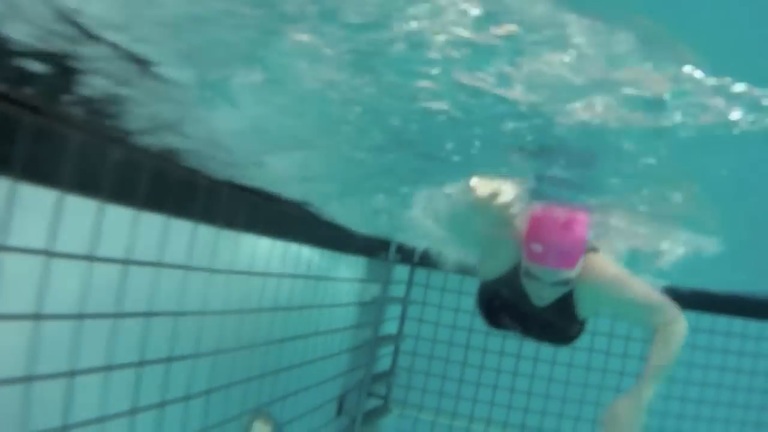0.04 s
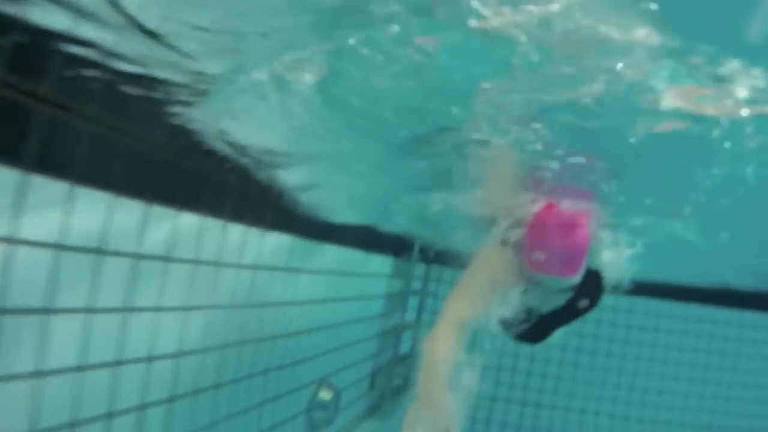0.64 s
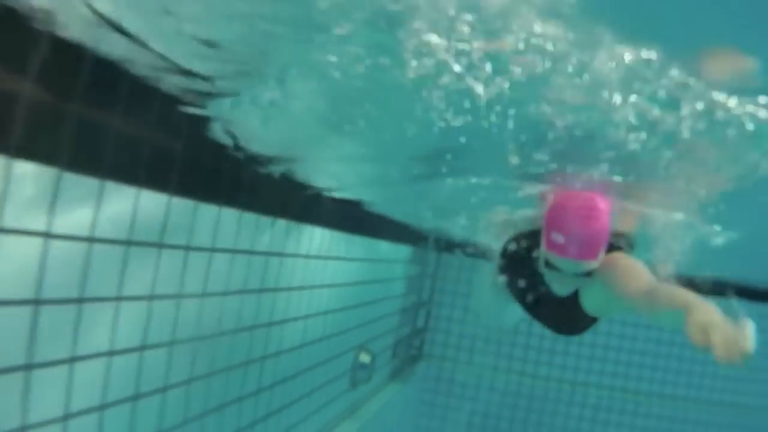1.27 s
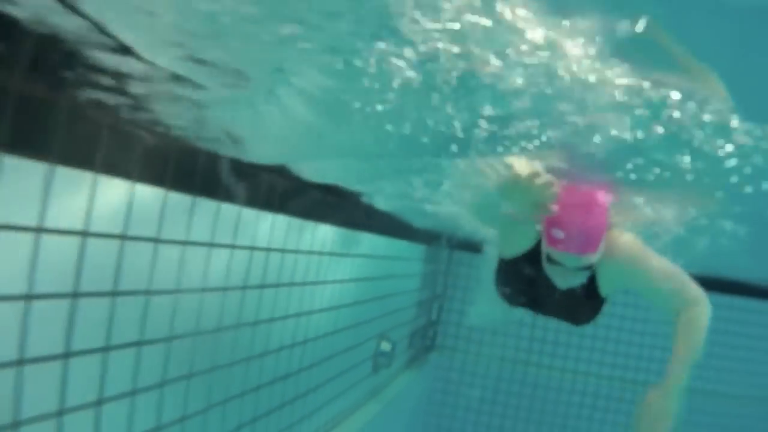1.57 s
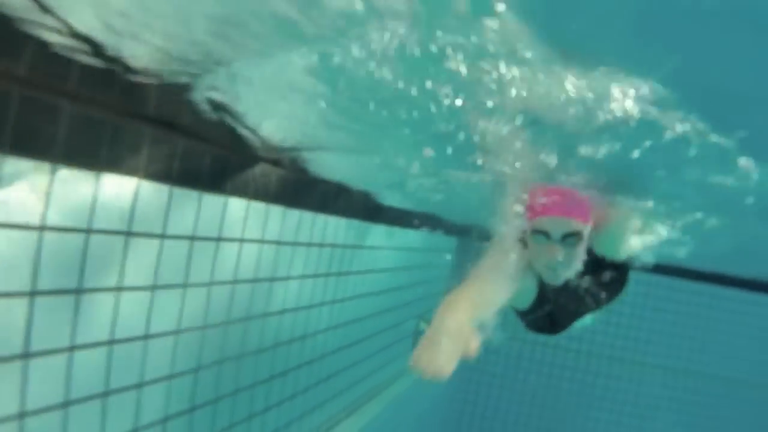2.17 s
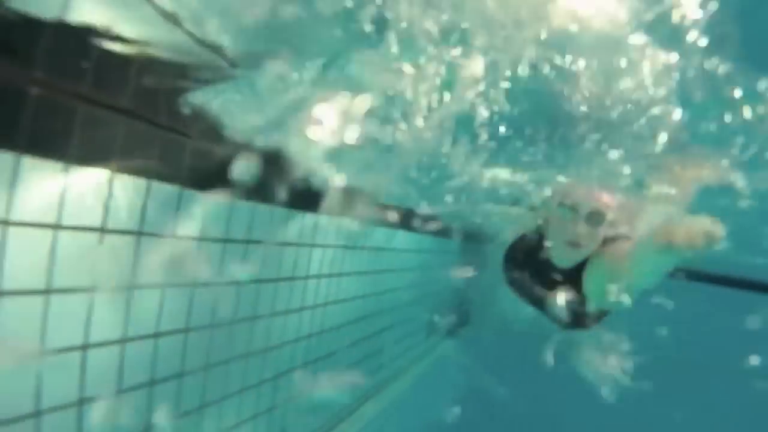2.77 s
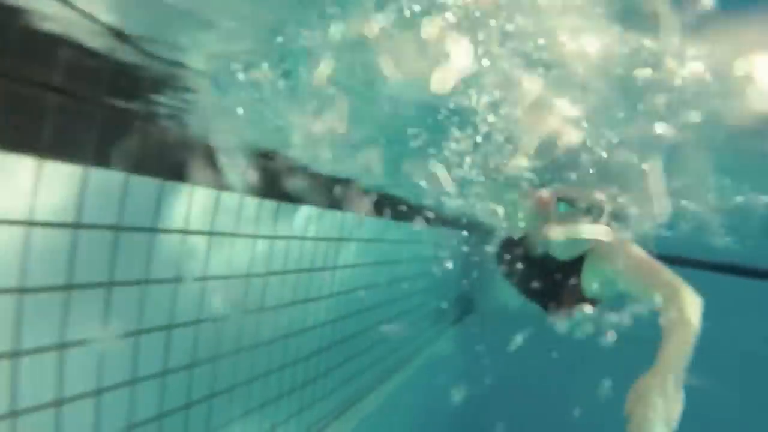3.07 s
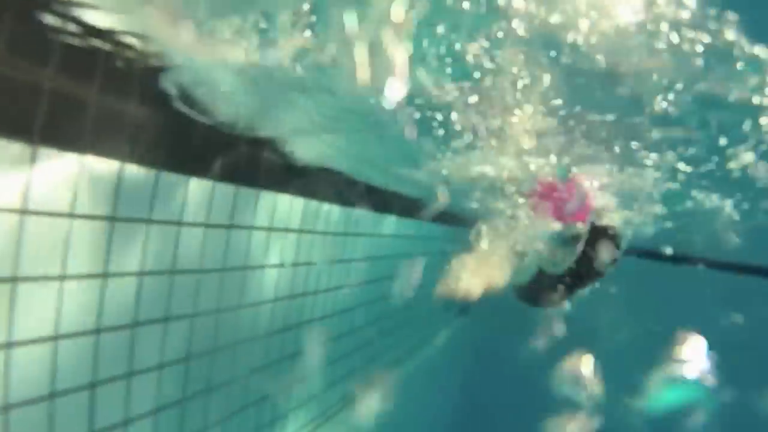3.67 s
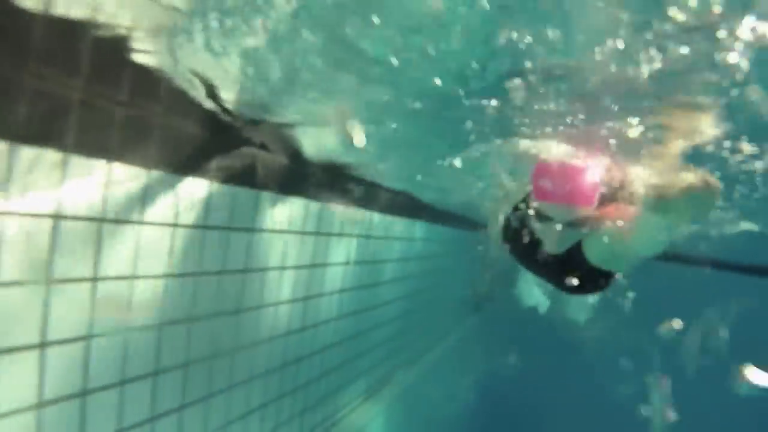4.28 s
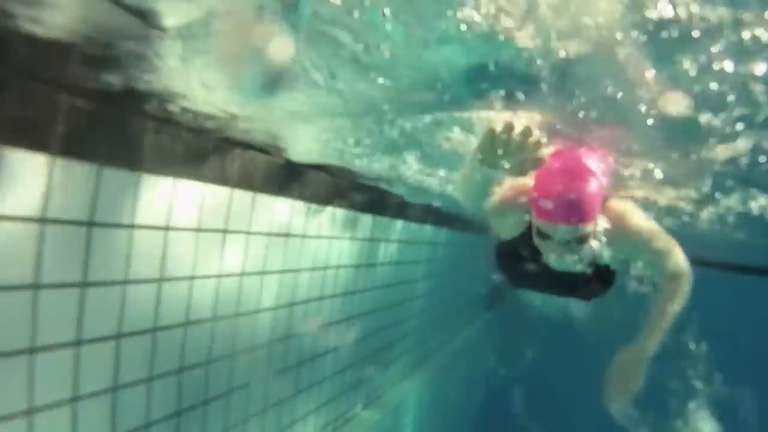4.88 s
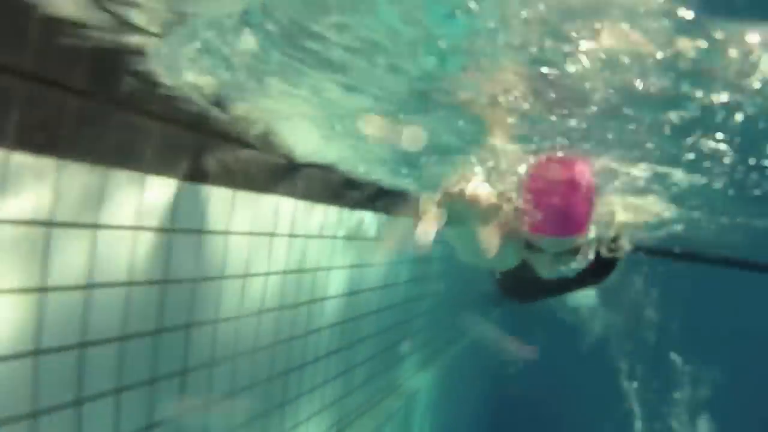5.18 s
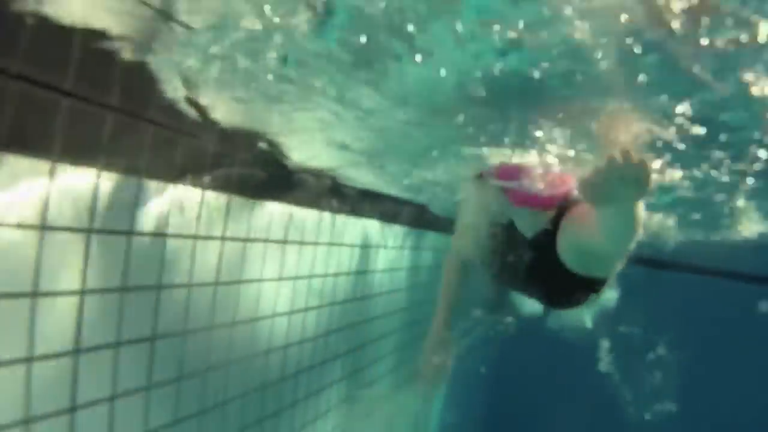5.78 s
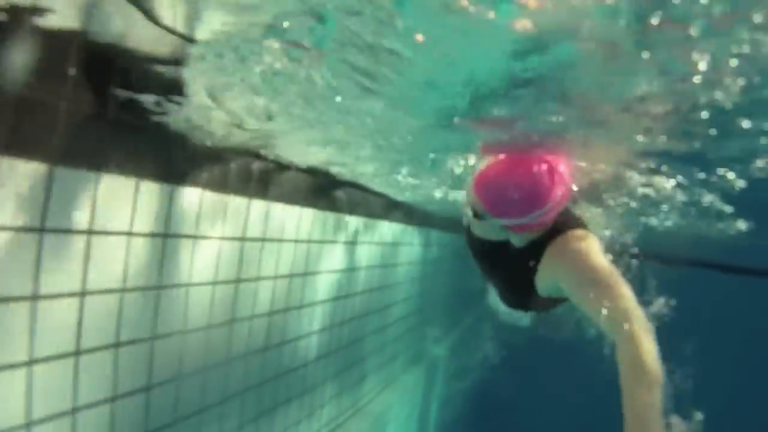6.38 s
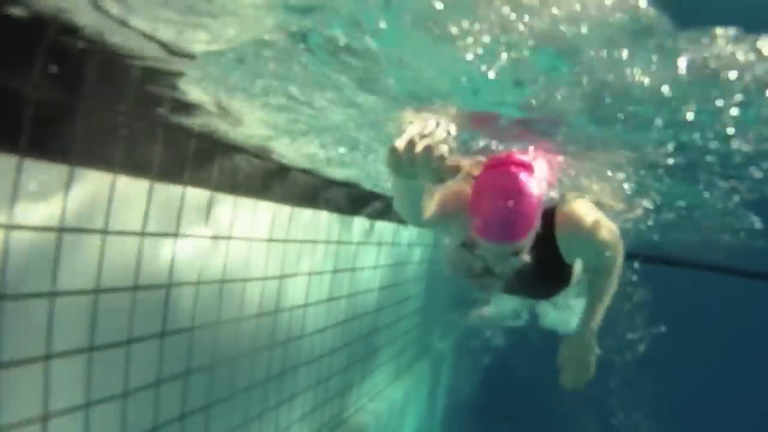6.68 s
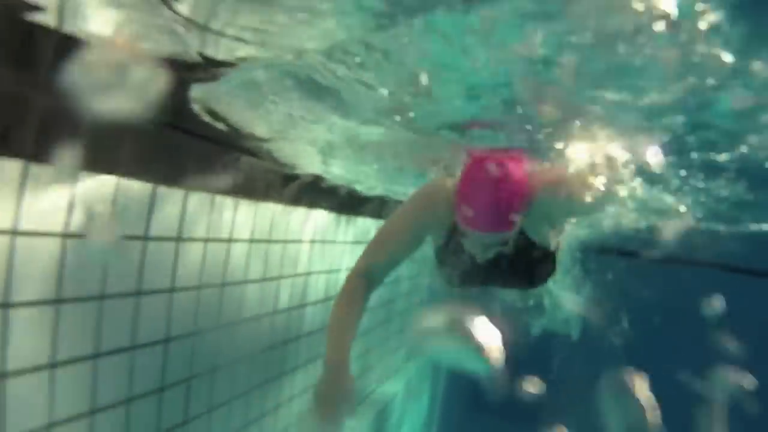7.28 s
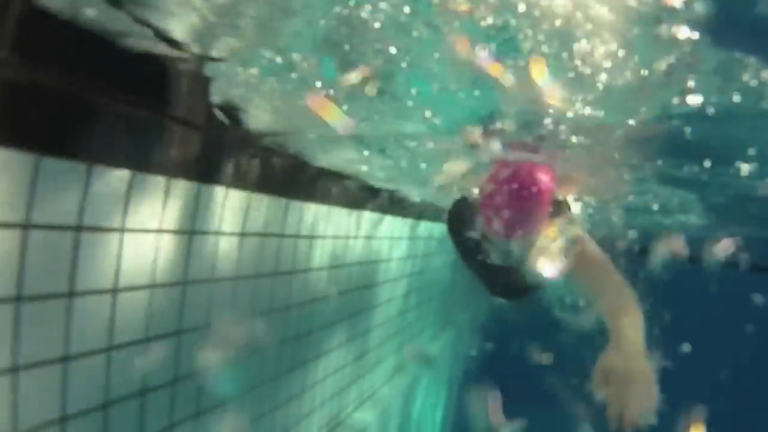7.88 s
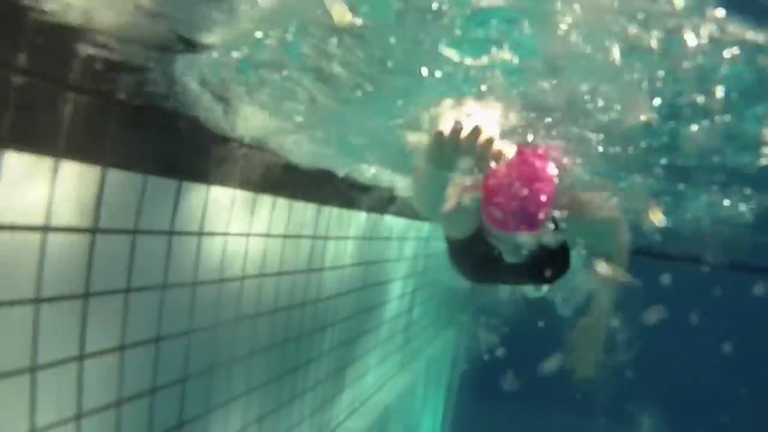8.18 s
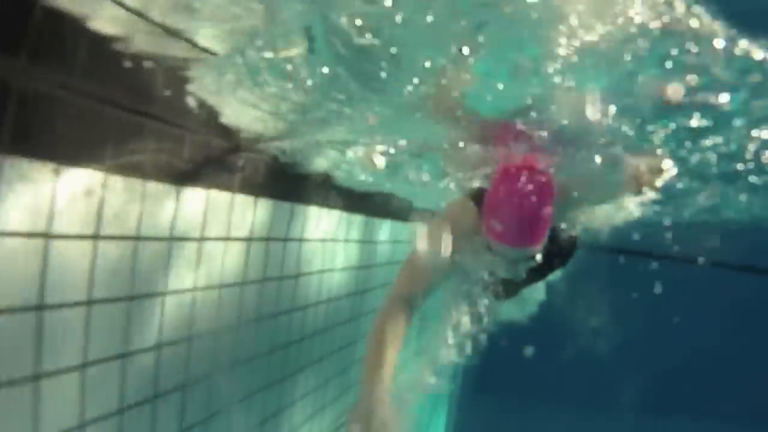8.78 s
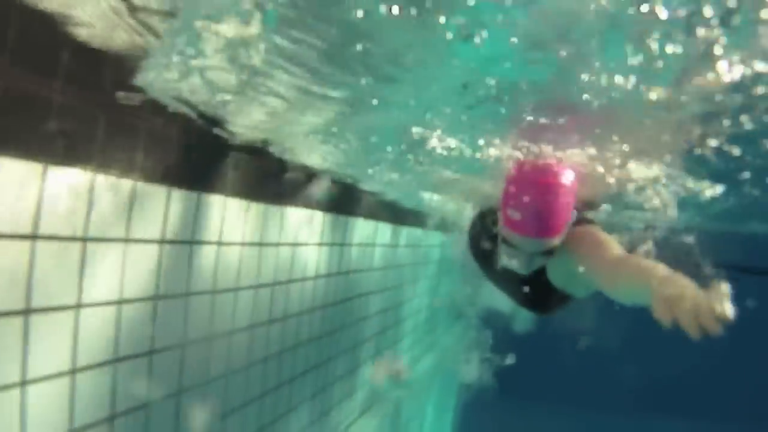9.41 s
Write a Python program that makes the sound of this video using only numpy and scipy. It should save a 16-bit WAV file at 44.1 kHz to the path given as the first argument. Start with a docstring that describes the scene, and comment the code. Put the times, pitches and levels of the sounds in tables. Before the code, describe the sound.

Underwater in a pool, a swimmer's crawl makes continuous bubbling and hollow glugs, with short splashes over a low rumble.

```python
"""An indoor pool, under water: a swimmer's crawl, heard through a camera's waterproof case.
Strokes and kicks drag air down. Each bubble rings as it pinches off, its air the spring and the
water around it the mass, and clouds of them gurgle close by. A large air pocket wobbles, the current
rumbles on the case and tiny bubbles tick against it. The camera limits loud peaks and samples at a
low rate, whose spectral images add a gritty sheen."""
import sys
import numpy as np
from scipy import signal
from scipy.fft import rfft, irfft, next_fast_len
from scipy.io import wavfile
from scipy.ndimage import uniform_filter1d, map_coordinates

SR = 44100
rng = np.random.default_rng(int(sys.argv[2]) if len(sys.argv) > 2 else 0)


def materialize(psi):
    """Save the field psi as 16-bit PCM at rate SR to the path in sys.argv[1].

    A 1-D psi becomes a single channel; in a 2-D psi each row is a channel.
    """
    bounded = np.clip(np.atleast_2d(psi).T, -1, 1)
    quanta = np.round(bounded * 32767).astype(np.int16)
    wavfile.write(sys.argv[1], SR, quanta)


N = 425565

# water pushing past the case: t/s, relative level/dB
CURRENT_LEVELS = [(0, -34), (.65, -34.5), (2.1, -38), (2.55, -34.5), (3.7, -40.5), (4.5, -36.5), (5, -39),
                  (5.5, -35.5), (6.3, -36.5), (8.6, -36.5), (9.65, -40)]
# spectrum of its turbulent pressure: f/Hz, relative level/dB
RUMBLE_SPECTRUM = [(12, -20), (22, 5), (45, -3), (78, -1.5), (100, 1.5), (125, -8.5), (155, -5.5),
                   (210, -17.5), (330, -9.5), (500, -20), (1000, -39.5)]
# transmission through the case: f/Hz, gain/dB
CASE_RESPONSE = [(200, -15), (400, -13.5), (480, -15.5), (630, -2), (780, -6), (1080, -14), (1200, -3),
                 (1400, -2.5), (1800, -8), (2150, 3), (2600, -8), (3500, -8), (4100, -16), (5600, 0)]
# the sharpest bursts of tiny bubbles on the case: t/s, level/dB
SHARP_TICKS = [(0.297, -22), (.7501, -27), (2.311, -31), (2.6632, -24), (3.0953, -29), (3.3798, -24),
               (3.7019, -31), (4.0455, -28.5), (4.164, -32.5), (4.402, -22.5), (6.826, -31), (7.8569, -27),
               (7.9388, -31), (8.752, -28.5)]
# big bubbles tearing off and shoving the case: t/s, peak level/dB
CASE_SHOVES = [(0.091, -17.5), (1.554, -14), (2.303, -15), (2.591, -8), (3.332, -5.5), (6.346, -20),
               (6.562, -10), (7.264, -10), (8.002, -11)]
# hands and feet slapping through the surface: t/s, peak level/dB
SURFACE_SLAPS = [(.576, -13), (.625, -13), (.663, -15.5), (2.92, -9), (3.11, -13), (4.337, -13),
                 (4.4, -8.5), (4.832, -12.5), (4.933, -12), (5.101, -11), (5.66, -9.5), (5.963, -14),
                 (6.346, -13.5), (6.454, -14), (7.14, -21), (7.557, -7.5), (7.732, -8), (8.317, -11),
                 (8.64, -26), (8.742, -12.5), (9.512, -14.5)]
# a large air pocket, one list for each time it forms: t/s, f/Hz, relative level/dB
POCKET_GLIDES = [
    [(.3, 342.4, -38), (.48, 338, -34), (.8, 355, -39.5), (1.23, 280.5, -43.5), (1.64, 270, -36),
     (1.87, 275, -43.5), (2.03, 295, -34), (2.1, 369, -29), (2.2, 447, -55)],
    [(2.55, 326, -36.5), (2.73, 250, -23.5), (2.95, 280, -32.5), (3.12, 316, -35), (3.32, 373, -33.5),
     (3.46, 480, -21), (3.62, 550, -27), (3.8, 570, -29)],
    [(7.44, 429, -27.5), (7.56, 363, -44), (7.68, 371.5, -31), (7.75, 400.3, -35.5), (8.2, 443, -43)],
]
# fainter bubbles, by size: f/Hz, rate/(1/s), peak level/dB, t60/s
STRAY_CLASSES = [(600, 2, -17.5, .06), (810, 2.5, -17.5, .04), (1310, 5, -17, .042), (2150, 3, -18.5, .018),
                 (3300, 2.5, -23, .012)]
# strength of the swarms: t/s, large-bubble level/dB, small-bubble level/dB
SWARM_LEVELS = [(0, -23, -38), (.25, -30, -35.5), (.65, -28.5, -36.5), (.9, -28, -37.5), (1.2, -26, -42),
                (1.6, -30, -35), (1.95, -34, -39.5), (2.2, -26.5, -37.5), (2.5, -19, -32),
                (2.82, -19.5, -40.5), (3.14, -23, -30), (3.5, -25, -41.5), (3.85, -26.5, -34.5),
                (4.2, -34.5, -39), (4.48, -25, -36.5), (5, -37, -37), (5.9, -34, -36.5),
                (6.5, -28.5, -36.5), (6.9, -33, -34.5), (7.18, -25.5, -35.5), (7.34, -25.5, -40.5),
                (7.6, -27, -32.5), (8.75, -31, -35), (9.65, -33.5, -39.5)]
# the loudest near bubbles: t/s, f/Hz, peak level/dB, t60/s
NEAR_BUBBLES = [(.009, 687, -9.5, 0.093), (.089, 637, 0, 0.025), (.094, 2080, -8, 0.0074),
                (.207, 1234, -9, 0.03), (.214, 810, -6, 0.045), (.22, 349, -15.5, .18),
                (.32, 346, -14, 0.28), (.332, 765, -17, 0.054), (.679, 2100, -9.5, 0.014),
                (.833, 696, -14, 0.23), (.863, 602, -5, 0.064), (1.059, 649, -7.5, 0.079),
                (1.119, 683, -8, 0.071), (1.15, 635, -11.5, 0.087), (1.202, 639, -2, 0.04),
                (1.237, 599, -13, 0.11), (1.32, 650, -11, 0.13), (1.419, 784, -13.5, .019),
                (1.55, 825, -9.5, 0.12), (1.615, 710, -5, .026), (1.941, 1290, -11.5, 0.077),
                (2.263, 612, -9, 0.11), (2.297, 1790, -8, 0.017), (2.301, 1150, -11.5, 0.13),
                (2.319, 1320, -8, 0.023), (2.414, 1240, -6.5, 0.01), (2.321, 622, -6, 0.11),
                (2.487, 704, -4.5, .015), (2.55, 510, -6, 0.052), (2.681, 620, -5.5, 0.058),
                (2.719, 620, -7, 0.031), (2.8, 631, -9, 0.12), (3.03, 1240, -5.5, 0.026),
                (3.044, 621, -11, 0.25), (3.09, 314, -14.5, 0.32), (3.239, 560, -9, 0.06),
                (3.28, 640, -7.5, 0.0097), (3.33, 560, -0.5, 0.024), (3.097, 3460, -14, 0.013),
                (3.108, 1905, -5, 0.0084), (3.281, 1610, -7, 0.017), (3.333, 1183, -2, 0.037),
                (3.399, 600, 4.5, 0.022), (3.446, 586, -3.5, 0.044), (3.559, 563, -6.5, 0.039),
                (3.602, 596.6, -2, 0.044), (3.765, 1370, -8.5, 0.033), (3.832, 647, -11, 0.039),
                (3.859, 1650, -8.5, 0.0071), (4.137, 643, -13.5, 0.12), (4.399, 2290, -7.5, 0.037),
                (4.487, 784, -13, .04), (4.514, 1285, -7.5, 0.044), (4.528, 600, -11, 0.082),
                (4.566, 777, -7, 0.023), (4.747, 780, -12.5, .04), (5.103, 1434, -15, .029),
                (5.392, 1475, -7.5, 0.026), (5.41, 1440, -6, 0.024), (5.659, 730, -14, 0.0077),
                (5.82, 1303, -7, 0.048), (5.869, 763, -4.5, .025), (6.076, 820, -16, 0.051),
                (6.271, 688, -12.5, 0.093), (6.36, 2970, -12, 0.013), (6.457, 1144, -13.5, 0.051),
                (6.563, 674, -1, 0.027), (7.023, 715, -8.5, 0.11), (7.088, 2300, -10, 0.021),
                (7.093, 687, -11, 0.057), (7.179, 607, 1.5, .03), (7.259, 672, 5.5, 0.033),
                (7.262, 2050, -.5, 0.0094), (7.784, 1152, -11.5, 0.076), (7.836, 588, -9.5, 0.15),
                (7.902, 2400, -12, .043), (8.001, 819, -9, .057), (8.016, 2140, -7, 0.005),
                (8.149, 632, -11.5, 0.09), (8.263, 2460, -12.5, .015), (8.473, 1606, -11.5, 0.024),
                (8.491, 3230, -15, 0.023), (8.652, 1290, -13, 0.09), (9.034, 676, -9.5, .11),
                (9.073, 1345, -10, .043), (9.127, 1540, -13, 0.053), (9.445, 563, -14.5, 0.11),
                (9.464, 1270, -19, 0.14)]


def amp(db):
    """Amplitude ratio of a level in decibels."""
    return 10 ** (np.asarray(db) / 20)


def unit(x):
    """Normalisation to rms 1."""
    return x / np.sqrt(np.mean(x ** 2) + 1e-20)


def curves(rows):
    """Linear interpolation: one value per sample for each column after the time."""
    times, *columns = np.transpose(rows)
    return [np.interp(np.arange(N) / SR, times, column) for column in columns]


def wobble(rate):
    """Slow random modulation: a spline through `rate` Gaussian knots a second."""
    knots = rng.standard_normal(int(N * rate / SR) + 4)
    return map_coordinates(knots, [np.arange(N) * rate / SR])


def add(track, s, sound):
    """Superposition: a short sound joins the track at s seconds."""
    part = track[max(round(s * SR), 0):][:len(sound)]
    part += sound[:len(part)]


def coloured(x, points):
    """Minimum-phase filtering through (f/Hz, gain/dB) points; folding the cepstrum makes it causal."""
    size = 2 * next_fast_len(N // 2 + SR // 4)
    hz, db = np.transpose(points)
    gain_db = np.interp(np.log(np.fft.rfftfreq(size, 1 / SR) + 1), np.log(hz), db)
    cepstrum = irfft(np.log(amp(gain_db)))[:size // 2]
    cepstrum[1:] *= 2
    return irfft(rfft(x, size) * np.exp(rfft(cepstrum, size)))[:N]


def low_pass(x, hz, order):
    """Zero-phase Butterworth roll-off above hz."""
    return signal.sosfiltfilt(signal.butter(order, hz, fs=SR, output="sos"), x)


def pool_echo(x, t60):
    """Reverberation: the surface and tiled walls scatter sound into an exponentially decaying tail."""
    t = np.arange(SR // 3) / SR
    tail = rng.standard_normal(len(t)) * amp(-60 * t / t60)
    return signal.fftconvolve(x, tail / np.linalg.norm(tail))[:N]


def current(lumpy_db=3.0, gain_db=1.0):
    """Turbulent pressure fluctuations load the case in soft, rumbling lumps."""
    db, = curves(CURRENT_LEVELS)
    rumble = coloured(rng.standard_normal(N), RUMBLE_SPECTRUM)
    return amp(db + gain_db) * unit(rumble * amp(lumpy_db * wobble(26)))


def bubble(hz, t60, swell_cycles, rise):
    """Minnaert resonance: a bubble swells and rings out, its pitch rising as it nears the surface."""
    t = np.arange(int(t60 * SR) + 2) / SR
    envelope = (1 - np.exp(-(t * hz / swell_cycles) ** 2)) * amp(-60 * t / t60)
    cycles = hz * (t + rise * t * t / t60)
    return envelope / envelope.max() * np.sin(2 * np.pi * (cycles + rng.random()))


def ticks(pitch_hz=5000, snap_t60=0.009, snap_db=-0.5, faint_per_second=0.87, faint_db=-39):
    """Impulsive excitation: tiny bubbles burst on the case, each with a snap and a short ping."""
    out, t = np.zeros(N), np.arange(SR // 40) / SR
    band = signal.butter(2, [2400, 5600], "band", fs=SR, output="sos")
    faint = [(s, faint_db) for s in rng.random(int(faint_per_second * N / SR)) * N / SR]
    for s, db in SHARP_TICKS + faint:
        snap = unit(signal.sosfilt(band, rng.standard_normal(len(t))))
        add(out, s, amp(db + snap_db) * snap * amp(-60 * t / snap_t60))
        hz = pitch_hz * np.exp(rng.normal(0, 0.12))
        add(out, s, amp(db) * bubble(hz, t60=0.017, swell_cycles=6.2, rise=0.081))
    return out


def shoves(time_constant_s=0.00064):
    """A bipolar pressure pulse: a big bubble tears off with a push and a slower pull, a dull knock."""
    out = np.zeros(N)
    age = np.arange(SR // 50) / SR / time_constant_s
    pulse = age * (2 - age) * np.exp(-age)
    for s, db in CASE_SHOVES:
        add(out, s, amp(db) * pulse / pulse.max())
    return out


def swarm(low_hz, high_hz, per_second, cycles, spread_db, wash_db):
    """Incoherent summation of many bubbles of one size range, heard through the case and held at rms 1."""
    rings = np.zeros(N)
    for when, size, strength, life in rng.random((int(per_second * N / SR), 4)):
        hz = low_hz * (high_hz / low_hz) ** size
        t60 = cycles * 2 ** (2 * life - 1) / hz
        gain = amp(-spread_db * np.sqrt(strength))  # few reach full strength
        add(rings, when * N / SR, gain * bubble(hz, t60, swell_cycles=0.92, rise=0.051))
    wash = amp(wash_db) * pool_echo(rings, t60=0.34)  # far bubbles blur together
    cloud = coloured(rings + wash, CASE_RESPONSE)
    power = np.abs(uniform_filter1d(cloud ** 2, size=SR // 8))
    return cloud / np.sqrt(power + 1e-12)


def swarm_levels(middle_db=2.5, middle_lean=0.32):
    """Levels/dB of large, middle and small bubbles; the middle is a raised, weighted mean of the others."""
    large, small = curves(SWARM_LEVELS)
    return large, small + middle_db + middle_lean * (large - small), small


def splashes(t60=0.095, attack_s=0.0019):
    """Air entrainment on impact: a slap frees a dense burst of bubbles of many sizes at once."""
    out, t = np.zeros(N), np.arange(SR // 5) / SR
    froth = swarm(439, 3680, per_second=1400, cycles=8.2, spread_db=0.5, wash_db=-9.0)
    envelope = (1 - np.exp(-t / attack_s)) * amp(-60 * t / t60)
    for s, db in SURFACE_SLAPS:
        burst = envelope * froth[rng.integers(N - len(t)):][:len(t)]
        add(out, s, amp(db) * burst / np.abs(burst).max())
    return out


def air_pocket(t60=0.22, jolts_per_second=70, fade_s=0.028, gain_db=2.0):
    """A randomly driven resonator: eddies jolt an air pocket, whose note climbs when it sheds bubbles."""
    out, t = np.zeros(N), np.arange(N) / SR
    pole = amp(-60 / (t60 * SR))
    for glide in POCKET_GLIDES:
        hz, db = curves(glide)
        jolts = (rng.random(N) < jolts_per_second / SR) * np.exp(2j * np.pi * rng.random(N))
        envelope = signal.lfilter([1], [1, -pole], jolts)
        ring = np.real(envelope * np.exp(2j * np.pi * np.cumsum(hz) / SR))
        inside_s = np.minimum(t - glide[0][0], glide[-1][0] - t)
        present = np.clip(inside_s / fade_s + 1, 0, 1)
        out += present * amp(db + gain_db) * unit(ring)
    return out


def pinch_snap(t60=0.019, peak_range_db=(-26, -8)):
    """A broadband transient: the neck of air breaks with a wet snap, sometimes sharp, sometimes faint."""
    t = np.arange(SR // 40) / SR
    band = signal.butter(2, [150, 1680], "band", fs=SR)
    snap = signal.lfilter(*band, rng.standard_normal(len(t))) * amp(-60 * t / t60)
    return amp(rng.uniform(*peak_range_db)) * snap / np.abs(snap).max()


def stray_bubbles(pitch_scatter=0.0873, life_scatter=0.29, scatter_db=2.0, follow=0.31):
    """Free oscillation of farther bubbles, pinched off at random and louder in harder churning."""
    out, middle_db = np.zeros(N), swarm_levels()[1]
    effort_db = middle_db - middle_db.mean()
    for class_hz, per_second, db, class_t60 in STRAY_CLASSES:
        count = int(per_second * N / SR)
        starts = (np.arange(count) + rng.random(count)) / count * N
        for start, (size, strength, life) in zip(starts.astype(int), rng.standard_normal((count, 3))):
            hz = class_hz * np.exp(pitch_scatter * size)
            t60 = class_t60 * np.exp(life_scatter * life)
            gain = amp(db + follow * effort_db[start] + scatter_db * strength)
            add(out, start / SR, gain * bubble(hz, t60, swell_cycles=3.7, rise=0.045))
            add(out, start / SR, gain * pinch_snap())
    return out


def gurgle(level_db=-31.5, growth=2.05):
    """Overlapping resonances: hard churning sheds strings of like-sized bubbles, a hollow glugging."""
    envelope = amp(level_db) * unit(amp(growth * swarm_levels()[0]))
    return envelope * swarm(530, 689.7, per_second=70, cycles=48, spread_db=17, wash_db=-12.5)


def churn(clump_db=2.5, surge_db=1.18, gulp_db=-15, gulp_growth=1.02, fizz_db=-21):
    """Strokes and kicks feed the swarms; resonance frequency varies inversely with bubble radius."""
    large, middle, small = [amp(db + surge_db * wobble(6)) for db in swarm_levels()]
    water = large * swarm(401, 996.5, per_second=400, cycles=28, spread_db=24, wash_db=-5.5)
    water += middle * swarm(900, 1773, per_second=460, cycles=47, spread_db=25.5, wash_db=-6.5)
    water += small * swarm(1770, 4100, per_second=700, cycles=52, spread_db=25.5, wash_db=-5.5)
    # the biggest gulps of air follow the large bubbles, the finest fizz the small ones
    gulps = amp(gulp_db) * large.mean() * unit(large ** gulp_growth)
    fizz = amp(fizz_db) * small
    water += gulps * swarm(185, 504, per_second=300, cycles=13.7, spread_db=20, wash_db=-2)
    water += fizz * swarm(3350, 5930, per_second=510, cycles=62, spread_db=35, wash_db=-15)
    # air breaks up in clumps that hold all sizes
    return water * unit(amp(clump_db * wobble(42)))


def near_bubbles(least_swell_cycles=1.18, swell_share=0.011):
    """Damped oscillation of single close bubbles; those that ring long also swell more gently."""
    out = np.zeros(N)
    for s, hz, db, t60 in NEAR_BUBBLES:
        swell_cycles = least_swell_cycles + swell_share * hz * t60
        add(out, s, amp(db) * bubble(hz, t60, swell_cycles, rise=0.046))
        add(out, s, amp(db) * pinch_snap())
    return out


def scene():
    """Linear superposition of everything that reaches the microphone in its case."""
    near = near_bubbles()
    walls = amp(-10) * pool_echo(near, t60=0.04)
    bubbling = near + walls + stray_bubbles() + churn() + gurgle() + air_pocket()
    return (bubbling + splashes() + current() + shoves() + ticks())[None]


def limited(x, threshold_db=-5, deepest_db=11, release_db_per_s=55, lag_s=0.02):
    """Automatic gain control: the gain ducks a moment after a loud peak and creeps back."""
    excess_db = np.clip(20 * np.log10(np.abs(x) + 1e-9) - threshold_db, 0, deepest_db)
    release_db = release_db_per_s * np.arange(N) / SR
    held_db = np.maximum.accumulate(excess_db + release_db) - release_db
    pole = np.exp(-1 / (lag_s * SR))
    return x * amp(-signal.lfilter([1 - pole], [1, -pole], held_db))


def record(dry, sample_hz=12000, top_hz=15700):
    """Zero-order hold: the camera limits, then holds each sample, mirroring bubbles into the treble."""
    saturated = np.clip(limited(dry[0]), -1, 1)
    sampled = signal.resample_poly(low_pass(saturated, hz=5610, order=10), sample_hz, SR)
    steps = signal.resample_poly(np.repeat(sampled, 4), SR, 4 * sample_hz)
    return low_pass(steps, top_hz, order=16)[None]


dry = scene()
out = record(dry)
materialize(out)
```